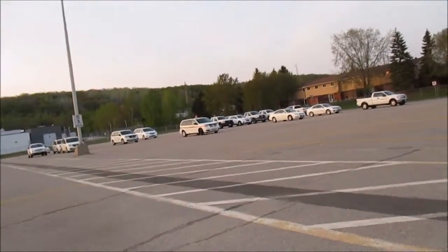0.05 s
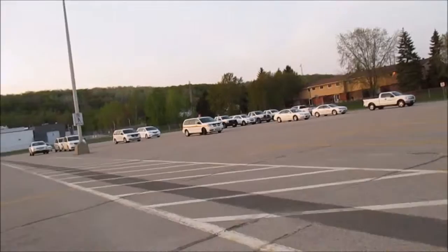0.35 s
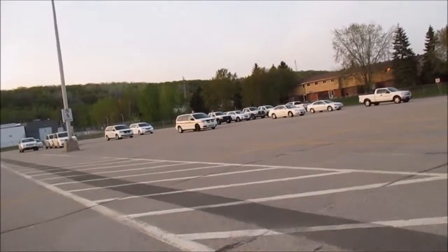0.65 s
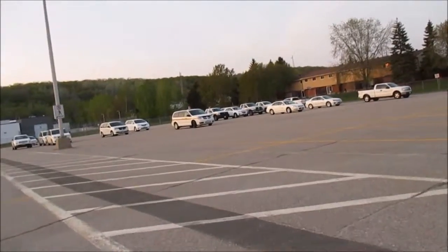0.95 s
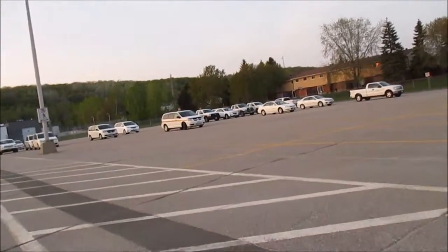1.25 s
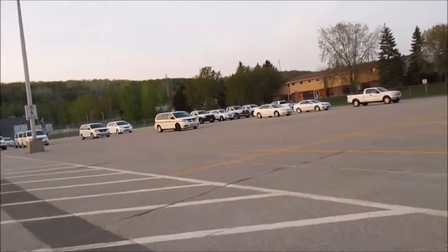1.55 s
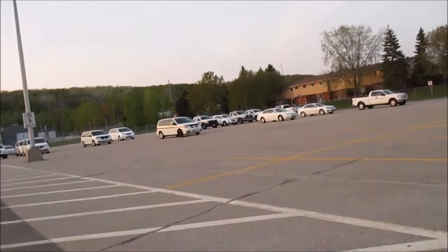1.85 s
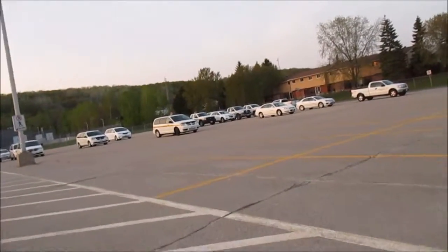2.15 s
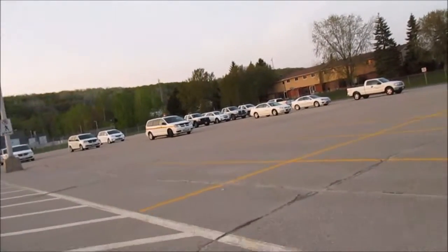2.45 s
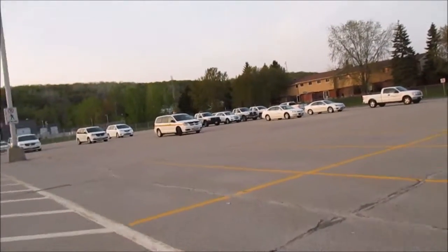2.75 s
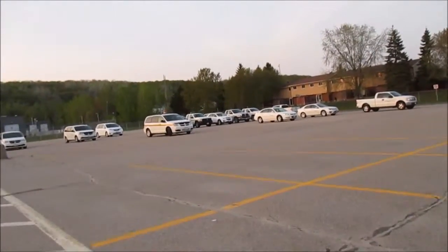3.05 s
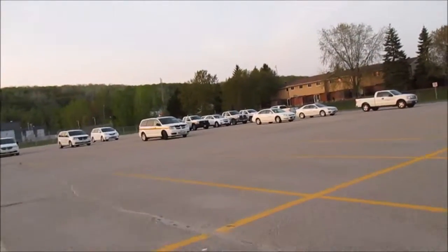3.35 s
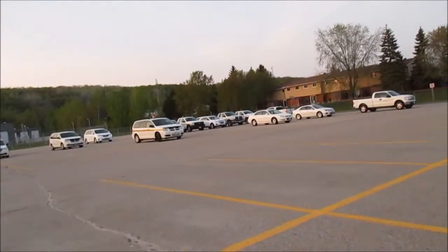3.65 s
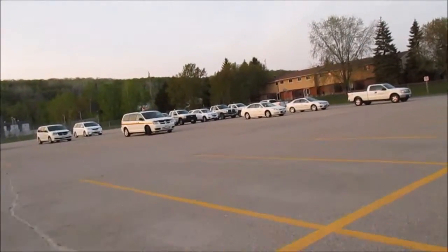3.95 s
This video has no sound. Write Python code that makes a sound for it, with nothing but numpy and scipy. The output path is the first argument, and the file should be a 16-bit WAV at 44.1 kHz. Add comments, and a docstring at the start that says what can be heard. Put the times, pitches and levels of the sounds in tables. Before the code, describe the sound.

Heard from the seat outdoors, a mobility scooter rolls steadily over rough asphalt, humming and faintly whining. Wind rumbles on the microphone, small stones snap under the tyres, and bumps now and then knock and rattle the plastic body.

```python
"""A cracked asphalt car park, heard from the seat of a cruising electric mobility scooter.
Wind brushes the microphone, and the tyres roll on grit and shake the hollow plastic body.
A loose metal part jingles, small stones snap under the wheels and loose panels knock.
Cracks jolt the frame with thuds and clatter. Through it all the motor hums and its gears whine faintly."""
import sys
import numpy as np
from scipy import signal
from scipy.fft import rfft, irfft
from scipy.io import wavfile

SR = 44100
rng = np.random.default_rng(int(sys.argv[2]) if len(sys.argv) > 2 else 0)


def int16_out(signal):
    """Quantize to a 16-bit WAV file."""
    q = np.round(np.clip(np.atleast_2d(signal).T, -1, 1) * 32767)
    wavfile.write(sys.argv[1], SR, q.astype(np.int16))


N = 176400
T = np.arange(N) / SR

# How strong the wind's rumble is: (time [s], level [dB])
WIND_LEVELS = [(0, -39), (.65, -30), (1.3, -36), (4, -40)]
# The wind's colour, meaning its mix of low and high sound: (frequency [Hz], relative level [dB])
WIND_COLOUR = [(15, -9.5), (55, 2.5), (120, -2.5), (200, -19.5), (3000, -100)]
# Heavier puffs of air: (time [s], level [dB])
WIND_PUFFS = [(.595, -19.5), (.675, -23), (.775, -26), (.845, -22)]
# Colour of the tyre roar: (frequency [Hz], relative level [dB])
TYRE_COLOUR = [(60, -8.5), (140, -9), (230, -0.5), (320, -1), (400, -7), (550, -6.5), (850, -6.5),
               (1050, -14), (1450, -18.5), (2200, -20), (2700, -26.5), (3600, -35), (5000, -40),
               (7000, -41), (13000, -51.5), (16000, -61)]
# Notes of the hollow panels drummed by the road: (pitch [Hz], width [Hz], level [dB])
PANEL_NOTES = [(224.7, 42, -39.5), (238, 33, -38.5), (288, 18.6, -38), (336, 26, -43.5), (4510, 180, -65.5),
               (5770, 230, -69)]
# Jingles of the loose metal part: (time [s], relative level [dB])
JINGLE_HITS = [(0.47, -50.5), (1.005, -49), (1.058, -47.5), (1.525, -54), (1.844, -47), (1.876, -51),
               (2.1384, -47.5), (2.298, -46), (2.552, -48.5), (2.87, -47.5), (3.396, -50), (3.951, -50)]
# Notes of that part: (pitch [Hz], relative level [dB], time to fade by 60 dB [s])
METAL_NOTES = [(5830, -5, 0.036), (5980, 0.5, 0.021), (7530, -2.5, 0.01), (8740, -4, 0.013),
               (9900, -8.5, 0.026), (10500, -7, 0.015)]
# Stones snapping under a tyre: (time [s], relative level [dB], pitch [Hz])
STONE_SNAPS = [(0.1095, -27.5, 4200), (.209, -36, 3000), (1.2416, -29, 4400), (1.673, -31.5, 4750),
               (3.507, -34.5, 4300), (3.862, -41.5, 4400)]
# Colour of a snap: (frequency [Hz], relative level [dB])
STONE_COLOUR = [(700, -28), (1500, 6), (2800, 2), (4300, -2.5), (5500, -5), (7000, -22), (10000, -21.5),
                (16000, -42)]
# Notes of the plastic body when struck: (pitch [Hz], width [Hz], relative level [dB])
PLASTIC_NOTES = [(366, 27, 4.5), (703, 15, -7), (908.6, 18.4, -5), (1243, 57, -7), (2330, 50, -15),
                 (2690, 77, -8.5), (3395, 74, -16.5)]
# Knocks on the body: (time [s], relative level [dB], pitch the knock favours [Hz])
BODY_KNOCKS = [(1.529, -26, 1300), (1.751, -22.5, 3200), (1.757, -21, 1400), (1.762, -27, 2700),
               (1.787, -26, 1100), (2.169, -25, 700), (2.194, -20.5, 900), (2.199, -30, 3000),
               (2.207, -26, 750), (2.218, -25.5, 1010), (3.015, -26, 420), (3.111, -23.5, 475),
               (3.863, -26, 475)]
# Jolts over cracks: (peak time [s], half length [s], thud [dB], relative clatter [dB], boom [dB])
CRACK_JOLTS = [(0.27, 0.018, -28.5, -59, -34), (1.524, 0.0069, -24, -38.5, -20),
               (1.547, 0.009, -25.5, -37, -41), (1.759, 0.012, -31, -34, -24.5),
               (1.867, 0.011, -29.5, -37, -19), (2.169, 0.01, -30, -39.5, -38),
               (2.207, 0.012, -38, -35.5, -38), (2.938, .007, -31, -60, -16), (3.118, 0.013, -24, -59, -25),
               (3.502, 0.0048, -33, -56, -16.5), (3.869, 0.016, -24, -39.5, -34)]
# Colour of a jolt's dull thud: (frequency [Hz], relative level [dB])
THUD_COLOUR = [(80, -7), (200, 14), (330, 5.5), (480, 4.5), (900, 0.5), (1300, -21), (6000, -51)]
# Colour of the plastic clatter: (frequency [Hz], relative level [dB])
CLATTER_COLOUR = [(400, -24), (1000, 8), (2200, 0), (3400, -9.5), (5000, -15.5), (13000, -36), (16000, -48)]
# Colour of crunching grit: (frequency [Hz], relative level [dB])
CRUNCH_COLOUR = [(2000, -14), (3600, 1.5), (6000, -9.5), (13000, -13), (16000, -29)]
# How fast the motor turns: (time [s], speed [turns per second])
MOTOR_SPEED = [(0, 87.3), (.5, 87.8), (1.1, 89.2), (1.9, 89.6), (2.6, 89), (3.3, 90.3), (4, 89.5)]
# Whine of the gears and brushes: (pitch [times the motor speed], level [dB], roughness [0-1])
WHINE_TONES = [(5.02, -46, 0.53), (13.97, -56.5, 0.96), (16.9, -56.5, 0.7), (33.93, -63, 0.9),
               (50.6, -66.5, 0.35), (54.2, -70.5, 0.8)]
# The lower hum, which comes and goes: (time [s], level [dB])
LOW_HUM_LEVELS = [(0, -35.5), (.275, -28), (.51, -32), (1.09, -37), (1.17, -36.5), (1.42, -32.5),
                  (1.65, -39.5), (2.0, -32), (2.29, -28.5), (2.36, -47), (2.5, -35.5), (2.79, -46),
                  (3.11, -33), (3.23, -47), (3.54, -36), (3.6, -29), (3.7, -37), (4, -51)]
# The upper hum, which swells into a firm note: (time [s], level [dB])
HIGH_HUM_LEVELS = [(0, -34), (.34, -39), (.39, -22.5), (.46, -35.5), (.66, -33), (.76, -21), (.82, -49),
                   (0.864, -22), (1.22, -27), (1.28, -36.5), (1.7, -31.5), (2.03, -31), (2.11, -33.5),
                   (2.8, -35.5), (3.14, -26.5), (3.27, -37.5), (3.56, -32.5), (3.64, -25), (3.85, -28),
                   (4, -31.5)]


def from_db(db):
    """Turn decibels into a number to multiply a sound by."""
    return 10 ** (np.asarray(db) / 20)


def unit_level(x):
    """Scale a signal so that its average strength (rms) is 1."""
    return x / np.sqrt(np.mean(x ** 2) + 1e-20)


def over_time(rows):
    """Join (time [s], value) points with straight lines."""
    return np.interp(T, *np.transpose(rows))


def swell(peak_s, half_s):
    """A bell-shaped rise and fall."""
    return np.exp(-.5 * ((T - peak_s) / half_s) ** 2)


def drift(rate_hz):
    """Smooth random wandering of strength 1; a higher rate wanders faster."""
    step, warm_up = 40, 2000
    keep = np.exp(-2 * np.pi * rate_hz * step / SR)
    noise = rng.standard_normal(N // step + warm_up + 2)
    slow = signal.lfilter([1], [1, -2 * keep, keep * keep], noise)[warm_up:]
    return np.interp(np.arange(N) / step, np.arange(len(slow)), unit_level(slow))


def coloured(x, colour):
    """Shape an even hiss or crackle with a colour table; the result has strength 1."""
    hz, db = np.transpose(colour)
    all_hz = np.maximum(np.arange(N // 2 + 1) * SR / N, 1)
    gains = from_db(np.interp(np.log(all_hz), np.log(hz), db))
    return unit_level(irfft(rfft(x) * gains, N))


def crackle(per_s, spread_db):
    """Random clicks of uneven size, with strength 1 overall."""
    sizes = from_db(spread_db * np.minimum(rng.exponential(1, N), 4))
    signs = rng.choice([-1, 1], N)
    return unit_level(sizes * signs * (rng.random(N) < per_s / SR))


def ring(x, hz, width_hz):
    """Make each click ring as a fading note; a smaller width rings longer."""
    keep, angle = np.exp(-np.pi * width_hz / SR), 2 * np.pi * hz / SR
    return signal.lfilter([0, np.sin(angle)], [1, -2 * keep * np.cos(angle), keep * keep], x + 1e-18)


def rough_tone(phase, rough, flutter_hz):
    """A tone between clean (rough = 0) and all flutter (rough = 1)."""
    flutter = drift(flutter_hz) * np.sin(phase) + drift(flutter_hz) * np.cos(phase)
    return np.sqrt(2 * (1 - rough ** 2)) * np.sin(phase) + rough * flutter


def wind():
    """Passing air makes a low rumble, with a few heavier puffs."""
    puff_level = sum(from_db(db) * swell(s, half_s=.012) for s, db in WIND_PUFFS)
    air = coloured(rng.standard_normal(N), WIND_COLOUR)
    puffs = puff_level * unit_level(ring(air, hz=87.5, width_hz=39))
    rumble = from_db(over_time(WIND_LEVELS)) * coloured(rng.standard_normal(N), WIND_COLOUR)
    return rumble + puffs


def tyres(roar_db=-32.5, grit_share=.44):
    """Tread on coarse asphalt makes a grainy roar that flutters with the load and drums the panels."""
    grit = crackle(per_s=1500, spread_db=1.5)
    road = np.sqrt(grit_share) * grit + np.sqrt(1 - grit_share) * rng.standard_normal(N)
    load = from_db(drift(rate_hz=26) + .5 * drift(rate_hz=1.6))
    panels = sum(from_db(db) * unit_level(ring(rng.standard_normal(N), hz, width))
                 for hz, width, db in PANEL_NOTES)
    return load * (from_db(roar_db) * coloured(road, TYRE_COLOUR) + panels)


def metal_jingles(gain_db=-5, bounces=5, gap_s=.003, bounce_loss_db=1, top_hz=11300):
    """The loose metal part bounces; each touch ticks and rings its notes in a different mix."""
    start_s, db = np.transpose(JINGLE_HITS)
    bounce = np.arange(bounces)
    touch_s = start_s[:, None] + gap_s * bounce * (.5 + rng.random((len(start_s), bounces)))
    touch_db = db[:, None] + gain_db - bounce_loss_db * bounce
    out = np.zeros(N)
    for hz, note_db, fade_s in METAL_NOTES:
        clicks = np.zeros(N)
        uneven_db = rng.normal(0, 2.7, touch_s.shape)
        clicks[(touch_s * SR).astype(int)] = from_db(touch_db + note_db + uneven_db)
        note = ring(clicks, hz, width_hz=np.log(1000) / (np.pi * fade_s))
        tick = ring(clicks, hz, width_hz=1500)
        out += note + tick
    return signal.sosfilt(signal.butter(8, top_hz, fs=SR, output="sos"), out)


def stone_snaps(gain_db=-2.5, rise_s=.0028, fall_s=.0017):
    """Each stone snaps out from under a tyre in a split second, with a pitch of its own."""
    snap = from_db(-1.5) * coloured(rng.standard_normal(N), STONE_COLOUR)
    hiss = rng.standard_normal(N)
    out = np.zeros(N)
    for start_s, db, hz in STONE_SNAPS:
        rise = np.clip((T - start_s) / rise_s, 0, 1)
        fall = np.exp(-np.maximum(T - start_s - rise_s, 0) / fall_s)
        note = from_db(-8.5) * unit_level(ring(hiss, hz, width_hz=250))
        out += from_db(db + gain_db) * rise * fall * (snap + note)
    return out


def panel_knocks(loss_db_per_octave=10):
    """Loose panels strike the body: soft hits give a hollow knock, hard ones a clank."""
    hit_s, db, favoured_hz = np.transpose(BODY_KNOCKS)
    out = np.zeros(N)
    for k, (hz, width, note_db) in enumerate(PLASTIC_NOTES):
        octaves_away = np.abs(np.log2(hz / favoured_hz))
        clicks = np.zeros(N)
        clicks[(hit_s * SR).astype(int)] = from_db(db + note_db - loss_db_per_octave * octaves_away)
        out += (-1) ** k * ring(clicks, hz, width)  # every other note swings the opposite way
    return out


def frame_boom(peak_s, hz=285.2, rise_s=.0091, fall_s=.012):
    """The frame starts to shake as a wheel climbs the edge of a crack, then settles."""
    level = np.where(T < peak_s, swell(peak_s, rise_s), np.exp(-np.abs(T - peak_s) / fall_s))
    return level * np.sin(2 * np.pi * (hz * T + rng.random()))


def jolts(crunch_db=-47, crunch_steepness=2.8):
    """Each crack shakes out a thud, a boom and plastic clatter; the hardest jolts also crunch grit."""
    thud_level = sum(from_db(db) * swell(s, half_s) for s, half_s, db, _, _ in CRACK_JOLTS)
    clatter_level = sum(from_db(db) * swell(s, half_s) for s, half_s, _, db, _ in CRACK_JOLTS)
    crunch_level = from_db(crunch_db) * (clatter_level / clatter_level.max()) ** crunch_steepness
    booms = sum(from_db(db) * frame_boom(s) for s, _, _, _, db in CRACK_JOLTS)
    taps = crackle(per_s=630, spread_db=-3.5) + .37 * rng.standard_normal(N)
    ringing = sum(from_db(db) * unit_level(ring(taps, hz, width)) for hz, width, db in PLASTIC_NOTES)
    thuds = thud_level * coloured(rng.standard_normal(N), THUD_COLOUR)
    clatter = clatter_level * (.92 * coloured(taps, CLATTER_COLOUR) + from_db(-6.5) * ringing)
    crunch = crunch_level * coloured(taps, CRUNCH_COLOUR)
    return thuds + booms + clatter + crunch


def motor_hum(phase, levels, rough, surge_db=2.3):
    """One tone of the turning motor, surging unevenly in loudness."""
    surge = unit_level(from_db(surge_db * drift(rate_hz=22)))
    return from_db(over_time(levels)) * surge * rough_tone(phase, rough, flutter_hz=20.5)


def motor(wobble=.005, controller_hz=11794):
    """Hum and gear whine follow the motor's speed; the speed controller adds a thin, high tone."""
    turns_per_s = over_time(MOTOR_SPEED) * (1 + wobble * drift(rate_hz=5))
    shaft_angle = 2 * np.pi * np.cumsum(turns_per_s) / SR
    low_hum = motor_hum(2 * shaft_angle, LOW_HUM_LEVELS, rough=.56)
    high_hum = motor_hum(3.03 * shaft_angle, HIGH_HUM_LEVELS, rough=.28)
    whine = sum(from_db(db) * rough_tone(multiple * shaft_angle, rough, flutter_hz=23)
                for multiple, db, rough in WHINE_TONES)
    controller = from_db(-81) * rough_tone(2 * np.pi * controller_hz * T, rough=.4, flutter_hz=20)
    return low_hum + high_hum + whine + controller


def scene():
    """Add all the sounds into one channel, as heard from the seat in open air."""
    return (motor() + tyres() + jolts() + panel_knocks() + stone_snaps() + metal_jingles() + wind())[None]


def record(dry):
    """Cut away the very highest treble, above 15700 Hz."""
    return signal.sosfilt(signal.ellip(10, .1, 80, 15700, fs=SR, output="sos"), dry)


dry = scene()
out = record(dry)
int16_out(out)
```